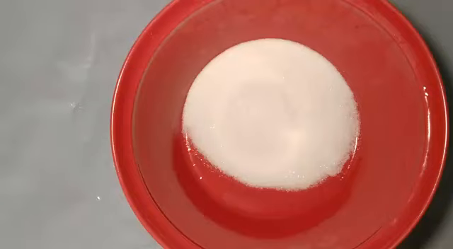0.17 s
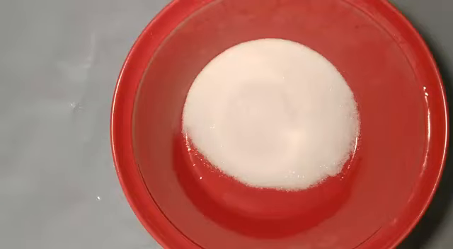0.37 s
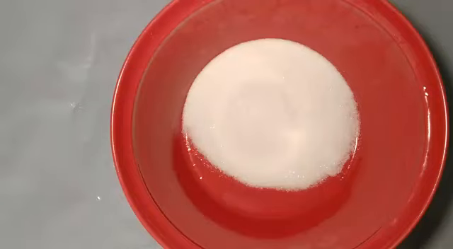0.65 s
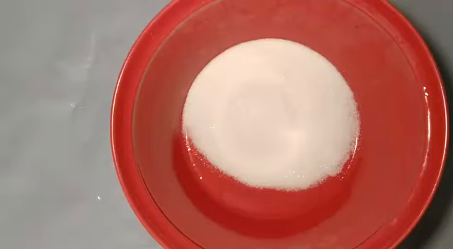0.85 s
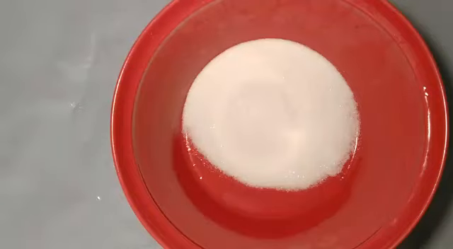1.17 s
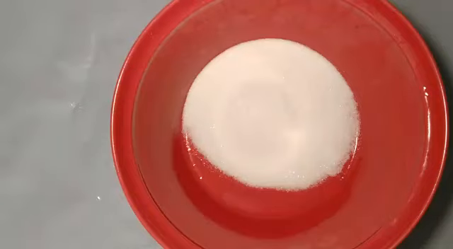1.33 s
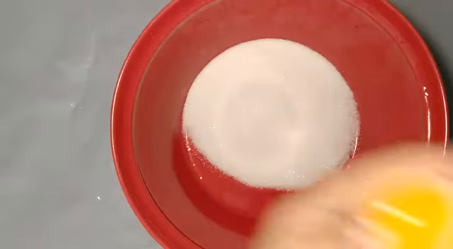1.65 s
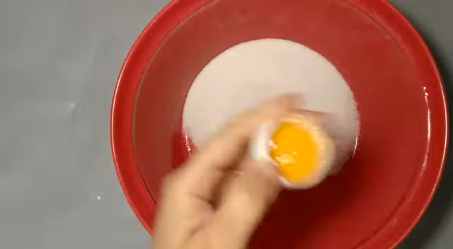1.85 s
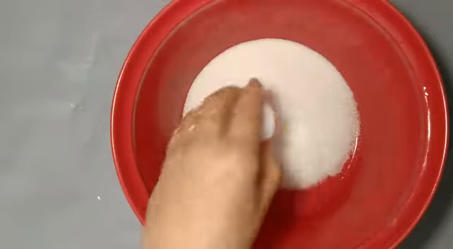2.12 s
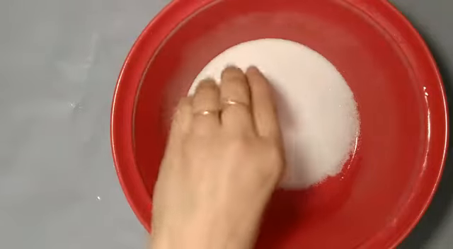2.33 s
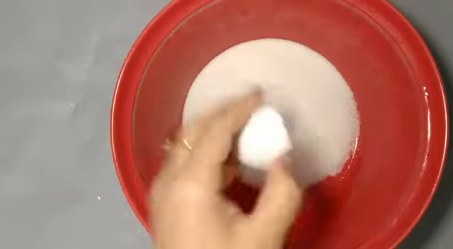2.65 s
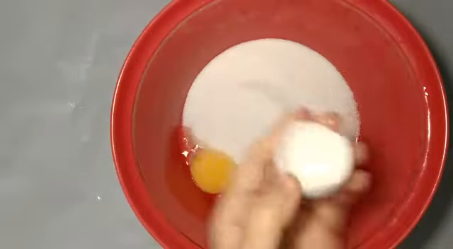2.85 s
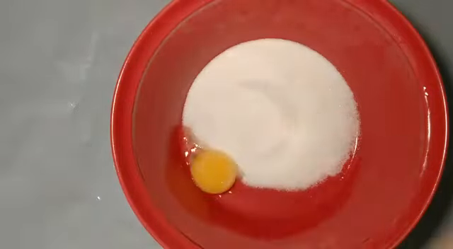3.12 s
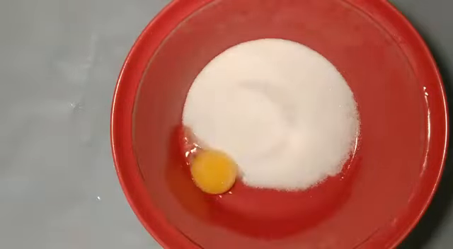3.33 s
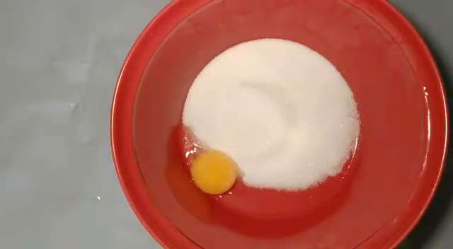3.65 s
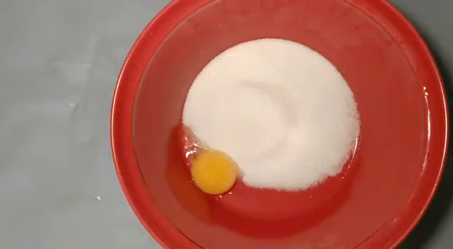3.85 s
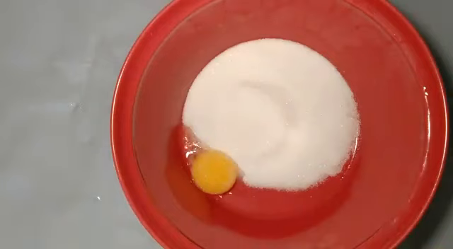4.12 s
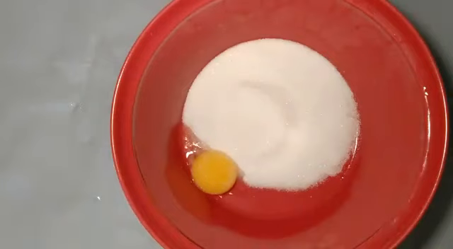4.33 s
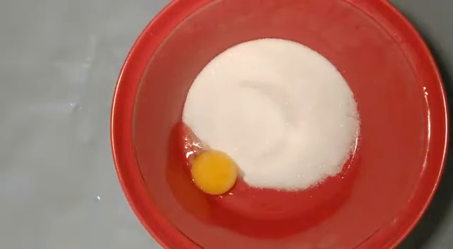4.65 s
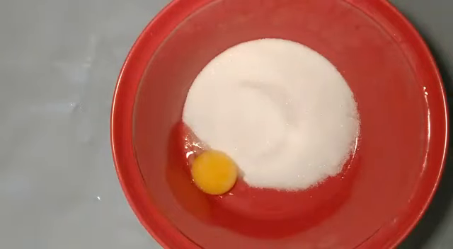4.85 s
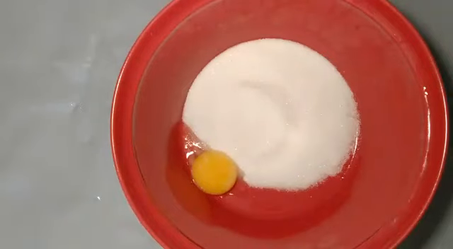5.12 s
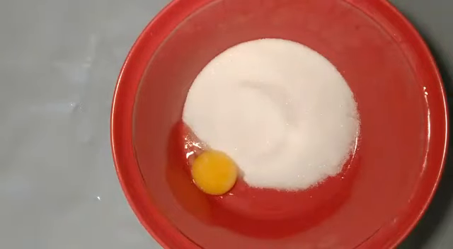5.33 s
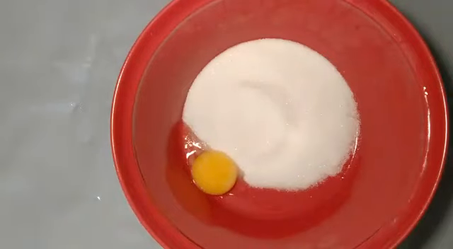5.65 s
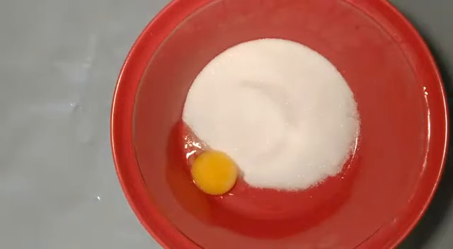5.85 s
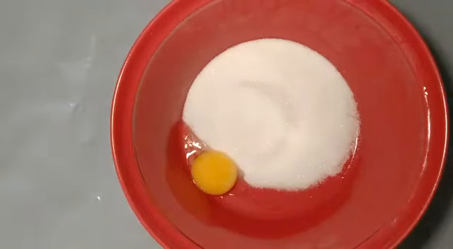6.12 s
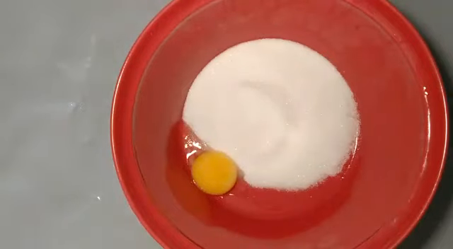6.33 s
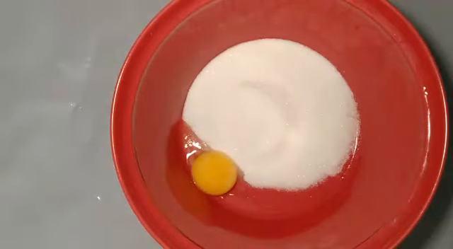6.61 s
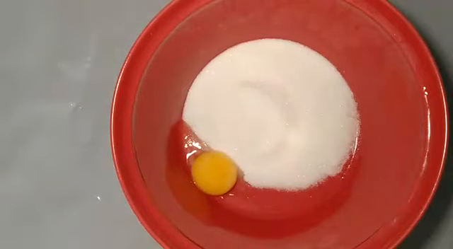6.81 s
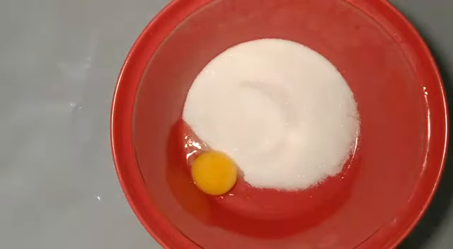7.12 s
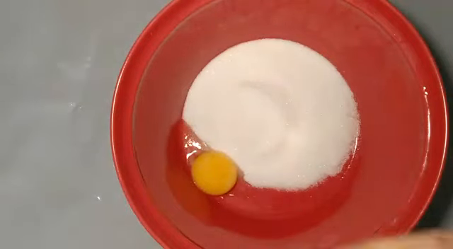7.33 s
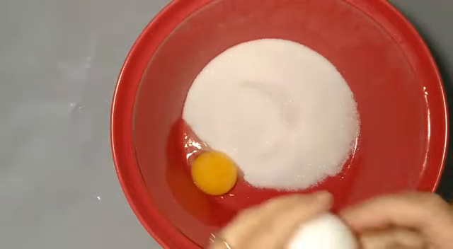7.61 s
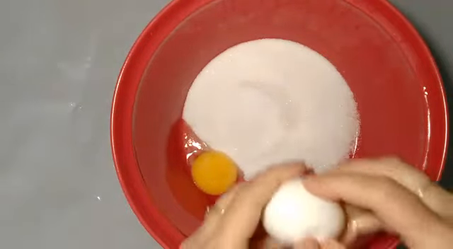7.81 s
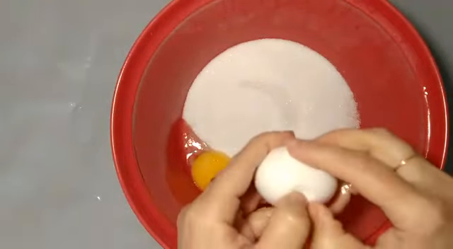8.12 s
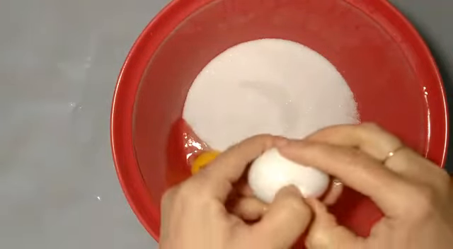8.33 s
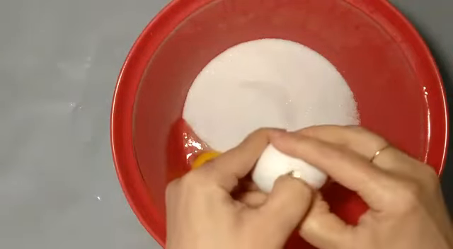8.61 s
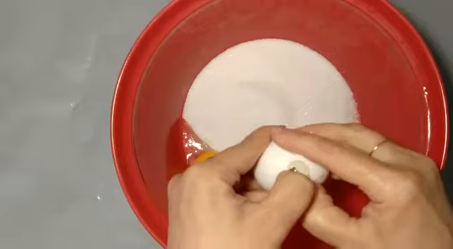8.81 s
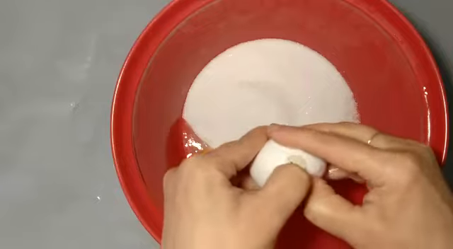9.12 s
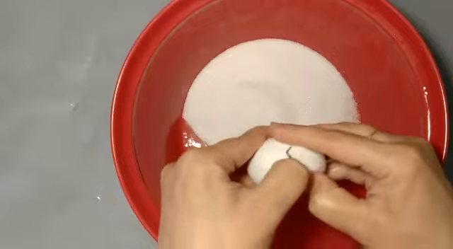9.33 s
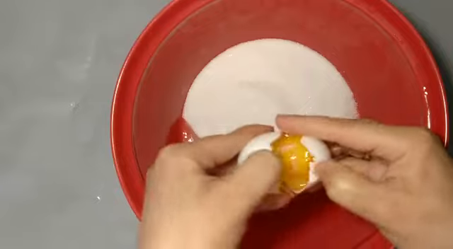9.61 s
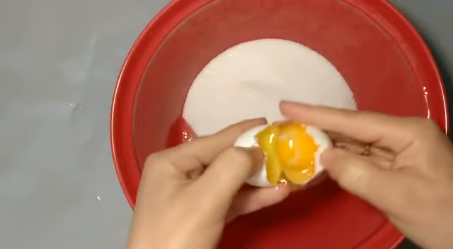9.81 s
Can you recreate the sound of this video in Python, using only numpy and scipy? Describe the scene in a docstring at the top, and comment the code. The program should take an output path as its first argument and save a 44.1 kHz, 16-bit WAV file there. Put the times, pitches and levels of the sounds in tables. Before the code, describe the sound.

Eggs are broken over a plastic bowl on a table, heard very near with short, lively kitchen reflections. Light crackles and brushing lead to a soft thump, then two strong brittle breaks, a pair of hollow knocks and one sharp, loud strike with a quick rebound. Fingers then pick at the shell with tiny dry ticks, and two more snaps open it. Quiet air, wavering appliance hum and deep rumble continue throughout.

```python
"""Eggs are broken over a plastic bowl on a table in a small, hard-walled kitchen, heard close by in stereo.
Light cracks, brushing fingers and soft bumps lead to strong breaks near 3.5 and 5 s, knocks, the hardest blow near
6.7 s, then loosened chips and two more breaks. Cracks are runs of tiny fractures; blows ring bowl and table and
rebound once; shell hollows pop; the bowl's foot slips and groans. Room reflections follow each sound.
Air, a wavering appliance hum and a low rumble lie behind throughout."""
import sys
import numpy as np
from scipy import signal
from scipy.fft import rfft, irfft
from scipy.io import wavfile
from scipy.ndimage import uniform_filter1d

SR = 44100
rng = np.random.default_rng(int(sys.argv[2]) if len(sys.argv) > 2 else 0)


def dump_mix(stems):
    """Bounce the given channels to the path in sys.argv[1] as a 16-bit WAV at rate SR."""
    frames = np.atleast_2d(stems).T  # one column per channel
    limited = np.clip(frames, -1, 1)  # hard clip at full scale
    pcm = np.round(limited * 32767).astype(np.int16)
    wavfile.write(sys.argv[1], SR, pcm)


N = 439236  # samples in the scene

# blows on bowl and table: [t/s, bowl strength before the contact filter/dB, contact hardness (low-pass edge)/Hz,
# table thud energy/dB, thud pitch/Hz]
BLOW_EVENTS = [ (1.533, -36, 1400, -54, 200), (2.721, -18.5, 904, -23, 160), (2.726, -19, 1380, -13.5, 305),
               (2.769, -20.5, 994, -15, 348), (4.242, -10.5, 202, -33, 69), (4.278, -23.5, 534, -19.5, 84),
               (4.396, -32, 1300, -32, 70), (4.546, -26, 730, -24, 99), (4.584, -25, 393, -19.5, 131),
               (4.669, -25, 348, -19, 125), (4.924, -15, 1160, -17, 86), (4.945, 4, 2350, -14.5, 80.6),
               (5.12, -26, 300, -21, 68.7), (5.509, -2, 728, -9, 191), (5.650, -3.5, 1030, -10, 177),
               (6.745, 12.5, 3340, 4.5, 150.6), (7.611, -33.5, 1790, -47.5, 195),
               (7.838, -29.5, 1220, -50, 198), (8.716, -27.5, 1470, -25.5, 566),
               (9.384, -32, 1330, -34.5, 570)]
# colour of breaking or brushed shell: [f/Hz, level/dB]
SHELL_COLOUR = [(100, -29), (450, -33), (900, -16.5), (1400, -11), (2300, -1), (3400, -10), (4800, -5),
                (6300, -5.5), (8000, -3), (10500, -3.5), (14000, -5)]


def shells(rows, facet_db=5.5, facet_octaves=0.36, body_edge_hz=4000, size=1024):
    """Fractures radiate from the brittle shell, strongest where the broken facets resonate."""
    # share of a crack's sideways lean taken by each pitch: [f/Hz, share]
    lean_share = [(2500, 0.042), (5000, 0.23), (9000, 1.03), (13500, 0.16)]
    # left minus right before that share; stronger cracks spread over the whole shell and lean less
    pan_db, pan_slope = 6, -0.2004  # slope in dB per dB of crack energy
    out, hz = np.zeros((2, N)), bins(size)
    body = 1 / (1 + (hz / body_edge_hz) ** 4)
    for s, db, ms, body_db, facet_hz in rows:
        octaves_off = np.log2((hz + 1) / facet_hz)
        facets = np.exp(-(octaves_off / facet_octaves) ** 2)
        colour = at(SHELL_COLOUR, hz) + body_db * body + facet_db * facets
        lean = (pan_db + pan_slope * db) * at(lean_share, hz) / 2
        left_and_right = [response(colour + lean), response(colour - lean)]
        crack = signal.fftconvolve(fractures(ms / 1000), left_and_right, axes=1)
        add(out, s, undb(db) * unit(crack))
    return out


def fractures(length, per_s=3500, slow_s=.02, scatter_db=4.0, snap=2.1, start=0.49, growth=0.8, size=4096):
    """A first snap and a dying run of micro-fractures; each facet reaches the two sides with its own lag."""
    count = 400
    gap, lag = rng.random((2, count))
    strength = undb(scatter_db * rng.standard_normal(count)) * rng.choice([-1, 1], count)
    strength[0] = snap
    # a slow crunch breaks into separate grains
    gap_s = -np.log(1 - gap) / per_s * (1 + length / slow_s)
    when = np.cumsum(gap_s)
    when -= when[0]
    strength *= np.minimum(1, start + when / (growth * length))  # the crack gathers speed
    strength *= np.exp(-(when / length) ** 2)  # and runs out
    out = np.zeros((2, size))
    for side, delay in enumerate((0, 0.00037 * lag)):
        sample = ((when + delay) * SR).astype(int)
        np.add.at(out[side], np.minimum(sample, size - 1), strength)
    return out


def chips(count=8):
    """Fingers loosen tiny chips at chance moments, given as rows for shells()."""
    # stretches of working at broken shell: [from/s, to/s]
    handling = [(0.801, 1.0), (2.299, 2.7), (8.2, 9.8)]
    per_s, chip_db, scatter_db, chip_ms, chip_hz = 2.2, -31, 2, 2.6, 9400
    rows = []
    for (start, end), draws in zip(handling, rng.standard_normal((len(handling), count, 2))):
        # one chip in each equal slot, at a chance place within it
        place = .5 + .5 * np.tanh(draws[:, 0])
        times = start + (np.arange(count) + place) / per_s
        for s, luck in zip(times, draws[:, 1]):
            if s < end:
                rows.append((s, chip_db + scatter_db * luck, chip_ms, 0, chip_hz))
    return rows


def pops(rise_s=0.00047):
    """The air in a shell's hollow gives a short pitched pop with one overtone."""
    # hollows ringing as they open or are struck: [t/s, energy of the main mode/dB, f/Hz, t60/s]
    hollows = [(2.731, -15, 890, 0.025), (3.522, -8, 2230, 0.051), (3.707, -9, 1800, 0.028),
               (4.944, 15.5, 2235, 0.0058), (4.950, 8.5, 1495, 0.0034), (6.7475, 14, 1500, 0.0049),
               (8.043, -27.5, 976, .012), (8.715, -18.5, 1345, 0.0089), (9.585, -28.5, 1310, 0.012),
               (9.6097, -5.5, 1524, 0.036), (9.779, -29.5, 2270, 0.022)]
    overtone_ratio, overtone_db = 1.4, -11.5
    out = np.zeros(N)
    for s, db, hz, t60 in hollows:
        main = swell_ring(hz, t60, rise_s)
        overtone = swell_ring(hz * overtone_ratio, t60, rise_s)
        add(out, s, undb(db) * (main + undb(overtone_db) * overtone))
    return out


def blows(ring_db=-12, low_db=-17, knock_db=1.5, place_db=1, size=2048):
    """A blow and its rebound knock and ring the bowl and a few low modes; a softer contact leaves only the low
    modes."""
    # plastic bowl modes: [f/Hz, level/dB, t60/s]
    bowl_modes = [(267, -23.5, 0.28), (323, -5.5, 0.12), (401.4, -12.5, 0.1), (557, -16, 0.32),
                  (591, -6.5, 0.23), (720, -8, 0.16), (873, 1.5, .12), (986, -7.5, 0.42), (1110, -16, 0.24),
                  (1215.6, -23.5, 0.24), (1350, -11, 0.25), (1450, -12.5, 0.15), (1650, -13, 0.52),
                  (1625, 5, 0.055), (1808, -10, 0.57), (1803, -6.5, 0.29), (1930, -7, 0.29),
                  (2300, -12, .12), (2672, -14, 0.17), (3014, -11.5, 0.1)]
    # low modes that ring under each blow: [f/Hz, level/dB, t60/s]
    low_modes = [(73.5, -0.5, 0.62), (132.2, -2, 0.22), (158.3, 7, 0.2)]
    # colour of the dry knock: [f/Hz, level/dB]
    knock_colour = [(25, -29), (60, -9.5), (150, -3.5), (300, -6.5), (450, -2), (680, -0.5), (880, 4.5),
                    (1600, -5.5), (2500, -3.5), (4000, 3), (14000, -31.5)]
    rebound_db = -2.5
    out, t = np.zeros(N), seconds(0.54)
    body = undb(low_db) * ring(low_modes, t)
    body[:size] += undb(knock_db) * unit(response(at(knock_colour, bins(size))))
    modes = []
    for k, (hz, db, t60) in enumerate(bowl_modes):
        modes.append(undb(db) * (-1) ** k * ring([(hz, 0, t60)], t))
    modes = np.array(modes)
    # each place of contact favours other modes
    places = undb(place_db * rng.standard_normal((len(BLOW_EVENTS), 2, len(bowl_modes))))
    for (s, db, hard_hz, _, _), pair in zip(BLOW_EVENTS, places):
        contact = signal.butter(4, min(hard_hz, SR / 3), fs=SR, output="sos")
        for late, drop_db, place in zip((0, rebound(hard_hz)), (0, rebound_db), pair):
            bowl = undb(ring_db) * unit(place @ modes)
            struck = signal.sosfilt(contact, body + bowl)
            add(out, s + late, undb(db + drop_db) * struck)
    return out


def rebound(hard_hz):
    """Seconds until the bowl drops back; sooner after a harder contact."""
    return 0.006604 * (1000 / hard_hz) ** 0.607  # 6.604 ms at a 1 kHz contact


def thuds(cycles=7, rise_s=0.0037, base_t60=.02):
    """The table swings a few times under each blow; the bowl's base booms as it drops back."""
    base_hz, base_db = 384, -5.5  # boom level is against the blow
    best_contact_hz, contact_octaves = 851, 1.7  # hardness that drives the base best, spread around it
    out, base = np.zeros(N), swell_ring(base_hz, base_t60, rise_s)
    for s, bowl_db, hard_hz, db, hz in BLOW_EVENTS:
        add(out, s, undb(db) * swell_ring(hz, cycles / hz, rise_s))
        drive = np.exp(-(np.log2(hard_hz / best_contact_hz) / contact_octaves) ** 2)
        add(out, s + rebound(hard_hz), undb(bowl_db + base_db) * drive * base)
    return out


def rubs(slips_per_s=220, foot_hz=305, foot_t60=0.057):
    """The bowl's foot sticks and slips on the table, with a low, soft groan."""
    # the bowl shifting on the table: [t/s, length/s, level/dB]
    shifts = [(1.861, 0.166, -71), (2.785, 0.4, -63), (5.976, 0.072, -66), (6.105, 0.23, -62.5),
              (8.78, 0.52, -69.5)]
    out = np.zeros(N)
    foot = ring([(foot_hz, 0, foot_t60)], seconds(.1))
    for s, length, db in shifts:
        t = seconds(length)
        slips = (rng.random(len(t)) < slips_per_s / SR) * rng.standard_normal(len(t))
        groan = signal.fftconvolve(slips * np.sqrt(1 - t / length), foot)
        add(out, s, undb(db) * unit(groan) * np.sqrt(len(t)))
    return out


def brushes(grains_per_s=1500, size=1024):
    """Skin catches on the shell's grain in a run of tiny ticks that swells and fades."""
    # fingers brushing over shell: [t/s, length/s, level/dB]
    strokes = [(0.439, 0.13, -71), (0.785, 0.1, -64), (5.381, 0.1, -62), (6.107, 0.076, -58),
               (7.56, 0.23, -66), (8.511, 0.14, -62.5)]
    out, shell = np.zeros((2, N)), response(at(SHELL_COLOUR, bins(size)))
    for s, length, db in strokes:
        t = seconds(length)
        ticks = (rng.random(len(t)) < grains_per_s / SR) * rng.standard_normal((2, len(t)))
        rustle = signal.fftconvolve(ticks * np.sin(np.pi * t / length), [shell], axes=1)
        add(out, s, undb(db) * unit(rustle) * np.sqrt(len(t)))
    return out


def from_left(x):
    """A source off to the left reaches the right side a little later."""
    # the work moves from the left to almost straight ahead: [t/s, lag of the right side/ms]
    side_lag = [(5.7, 0.3), (6.7, 0.17), (8.0, .04)]
    t = np.arange(N) / SR
    lag_s = np.interp(t, *np.transpose(side_lag)) / 1000
    return np.array([x, np.interp(t - lag_s, t, x)])


def kitchen(near_db=-6, near_s=0.0072, walls_db=-2, build_s=0.00057):
    """Quick reflections off bowl, hands and table, then the walls' tail, whose treble dies first."""
    # kitchen reverberation: [f/Hz, t60/s]
    room_t60 = [(100, .58), (400, 0.45), (1400, 0.41), (4000, 0.34), (8000, 0.34), (14000, 0.18)]
    t = seconds(0.78)
    hz, field = bins(len(t)), diffuse(len(t))
    centres = 125 * 2. ** np.arange(8)  # octave bands
    tail = 0
    for centre, weights in zip(centres, np.eye(len(centres))):
        band = irfft(field * at(np.c_[centres, weights], hz), len(t))
        tail = tail + band * np.exp(-np.log(1000) * t / at(room_t60, centre))
    tail = even(tail) * (1 - np.exp(-t / build_s))  # the walls answer a little late
    tail *= t < .6
    # small nearby things reflect mostly short waves
    near = irfft(diffuse(len(t)) * hz / (hz + 2000), len(t))
    near *= np.exp(-t / near_s) * (t > .001)
    return undb(near_db) * unit(near) + undb(walls_db) * unit(tail)


def background(air_db=-59, waver_hz=.5, waver_db=1):
    """Still room air as coloured noise, and an appliance hum whose pitch and level waver slightly."""
    # colour of the air: [f/Hz, level/dB]
    air_colour = [(12, -28), (20, -10), (75, -3.5), (104, -16.5), (122, -13.5), (156, -10), (206, -17),
                  (356, -11.5), (567, -16.5), (632, -16), (809, -19), (1160, -19), (1890, -22.5),
                  (3650, -21.5), (14000, -21)]
    # faint peaks in the hiss: [f/Hz, width/Hz, lift/dB]
    hiss_peaks = [(3530, 88, 6), (7710, 420, 4)]
    # appliance hum before its waver: [f/Hz, level/dB, phase between the sides/rad]
    hum_tones = [(47, -69, .3), (100.7, -74, .3), (151, -81.5, 0.33), (288, -80, 0.72), (639.7, -68, 0.69)]
    hz = bins(N)
    colour = at(air_colour, hz)
    for centre, width, db in hiss_peaks:
        colour = colour + db * np.exp(-((hz - centre) / width) ** 2)
    air = irfft(diffuse(N) * undb(colour), N)
    out = unit(air) * np.sqrt(N) * undb(air_db)
    for tone_hz, db, lag in hum_tones:
        phase = 2 * np.pi * np.cumsum(tone_hz + waver_hz * walk(4.9)) / SR
        level = np.sqrt(2) * undb(db + waver_db * walk(9.1))
        out += level * np.sin([phase, phase - lag])
    return out


def rumble(db=-65, edge_hz=22, swell_db=3, swells_per_s=5):
    """A very low rumble, noise below a soft edge, that swells and sinks."""
    low = irfft(diffuse(N) / (1 + (bins(N) / edge_hz) ** 4), N)
    return unit(low) * np.sqrt(N) * undb(db + swell_db * walk(swells_per_s))


def undb(db):
    """Decibels to gain."""
    return 10 ** (np.asarray(db) / 20)


def at(points, hz):
    """Read (Hz, value) points on a log-frequency axis."""
    f, value = np.transpose(points)
    return np.interp(np.log(np.maximum(hz, 1)), np.log(f), value)


def bins(size):
    """Frequencies of a real transform in Hz."""
    return np.arange(size // 2 + 1) * SR / size


def seconds(length):
    """Time axis of a short sound."""
    return np.arange(int(length * SR)) / SR


def unit(x):
    """Scale to unit energy, averaged over the channels."""
    return x / np.sqrt(np.mean(np.sum(x ** 2, axis=-1)))


def add(track, s, sound):
    """Mix a sound in at time s."""
    start = int(s * SR)
    sound = sound[..., :N - start]
    track[..., start:start + sound.shape[-1]] += sound


def response(db):
    """Causal, minimum-phase impulse response with the given gain in each bin."""
    cepstrum = irfft(np.log(undb(db)))
    half = len(cepstrum) // 2
    cepstrum[1:half] *= 2
    cepstrum[half + 1:] = 0
    return irfft(np.exp(rfft(cepstrum)))


def ring(modes, t):
    """Decaying modes of alternating sign, balanced by their dB; unit energy in all."""
    total = 0
    for k, (hz, db, t60) in enumerate(modes):
        mode = np.sin(2 * np.pi * hz * t) * np.exp(-np.log(1000) * t / t60)
        total = total + (-1) ** k * undb(db) * unit(mode)
    return unit(total)


def swell_ring(hz, t60, rise_s):
    """One mode that takes a moment to get going; unit energy."""
    t = seconds(.2)
    return unit(ring([(hz, 0, t60)], t) * (1 - np.exp(-t / rise_s)))


def walk(rate):
    """Slow random wander with a spread near 1 and the given number of knots per second."""
    knots = rng.standard_normal(int(N / SR * rate) + 2)
    return np.interp(np.arange(N) / SR * rate, np.arange(len(knots)), knots)


def diffuse(size):
    """Spectrum of stereo noise from all around, the likeness of its sides set at each pitch."""
    # likeness of the two sides: [f/Hz, correlation]
    likeness = [(30, -0.028), (130, 0.4), (300, 0.47), (650, 0.772), (1200, -0.033), (2500, 0.015)]
    mid, side = rfft(rng.standard_normal((2, size)))
    alike = np.clip(at(likeness, bins(size)), -1, 1)
    return mid * np.sqrt(1 + alike) + np.array([[1], [-1]]) * side * np.sqrt(1 - alike)


def even(x, size=121):
    """Many paths together carry about the same energy at every pitch."""
    spectrum = rfft(x)
    smooth_power = uniform_filter1d(np.abs(spectrum) ** 2, size)
    return unit(irfft(spectrum / np.sqrt(smooth_power), x.shape[-1]))


def scene(shell_room_db=0, pop_room_db=-5, bowl_room_db=0, thud_room_db=-4):
    """Shell, bowl and table sound directly and through the kitchen."""
    # shell fractures: [t/s, energy/dB, length/ms, body below 4 kHz/dB, pitch of the breaking facets/Hz]
    cracks = [ (.509, -26, 3.3, 12, 8200), (.530, -19, 1.7, -7, 8000), (.720, -22.5, 5.1, 6.5, 9500),
              (2.368, -28, 2, -6, 11000), (2.5757, -25, 1.04, -1, 12700), (3.522, -2, 6.6, 3, 12300),
              (3.583, -10.5, 6, 1.5, 9700), (3.672, -5, 33.5, -2, 7000), (3.690, -12.5, 9, 6, 6000),
              (3.701, 4, 10, -3.5, 4850), (3.745, -6, 10, 5.5, 10800), (3.805, -13.5, .5, -10, 8250),
              (4.547, -28, 5.8, 4, 5300), (4.900, -3.5, 12, -4.5, 10100), (4.917, 2, 22.7, 6, 10300),
              (4.943, 4.5, 6, 15, 5800), (5.082, -2.5, 10.9, 3.5, 10900), (5.510, -17.5, 2, 0, 6200),
              (5.651, -15, 2.7, -5.5, 6560), (6.7405, 0, 4.2, -6, 12000), (6.7435, 16.5, 5.3, 3.5, 5480),
              (7.42, -24, 1.95, -2, 7250), (8.043, -18, 2.2, 0.5, 6980), (8.496, -22, 2.6, -1, 9800),
              (8.546, -15.5, 6.8, -4.5, 11200), (8.701, -22.5, 10, 4, 8700), (8.713, 0.5, 7.1, -0.5, 8000),
              (8.978, -19, 6.2, 1.5, 9800), (9.0, -26.5, 2.9, 9.5, 5990), (9.287, -28, 2, -7.5, 10800),
              (9.358, -16, 3.9, -6, 9870), (9.370, -28.5, 7.2, 4, 3000), (9.536, -23.5, 4.7, 9, 10000),
              (9.5865, -29.5, 1.9, -5, 8900), (9.6093, 2, 3.06, -7, 10900)]
    walls, air = kitchen(), background()
    hollow, bowl, table = pops(), blows(), thuds() + rubs()
    shell = brushes() + shells(cracks) + shells(chips())
    send = undb(shell_room_db) * shell + undb(pop_room_db) * hollow
    send = send + undb(bowl_room_db) * bowl + undb(thud_room_db) * table
    room = signal.fftconvolve(send, walls, axes=1)[:, :N]
    return shell + from_left(hollow + bowl + table) + room + air + rumble()


def record(dry):
    """Soft saturation rounds the hardest peaks, then a steep low-pass cuts the top."""
    rounded = .85 * np.tanh(dry / .85)
    top_cut = signal.ellip(10, .2, 80, 14400, fs=SR, output="sos")  # edge in Hz
    return signal.sosfilt(top_cut, rounded)


dry = scene()
out = record(dry)
dump_mix(out)
```